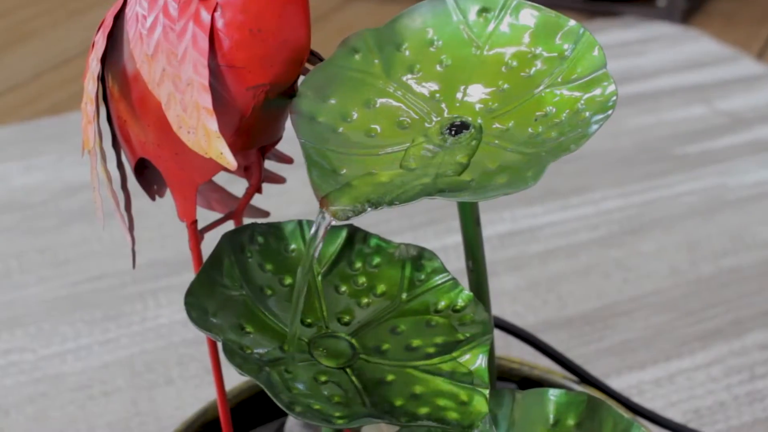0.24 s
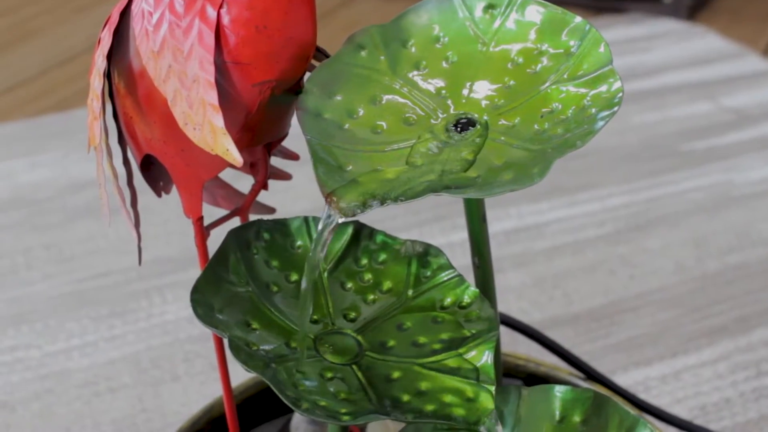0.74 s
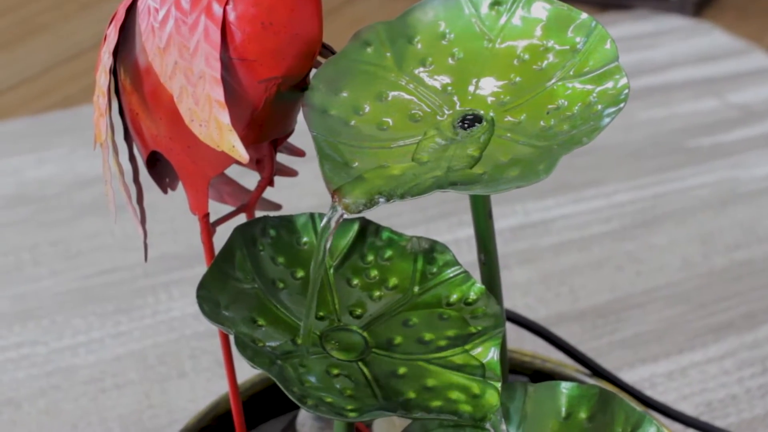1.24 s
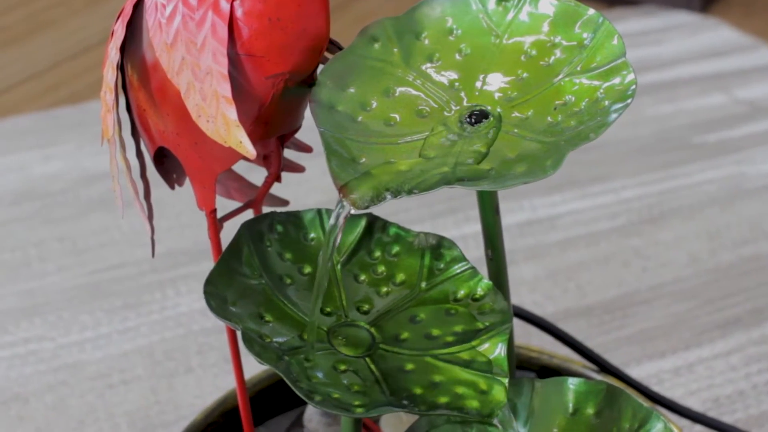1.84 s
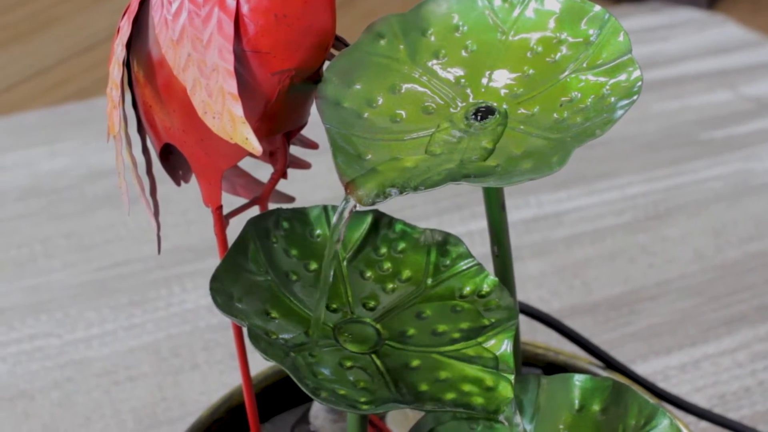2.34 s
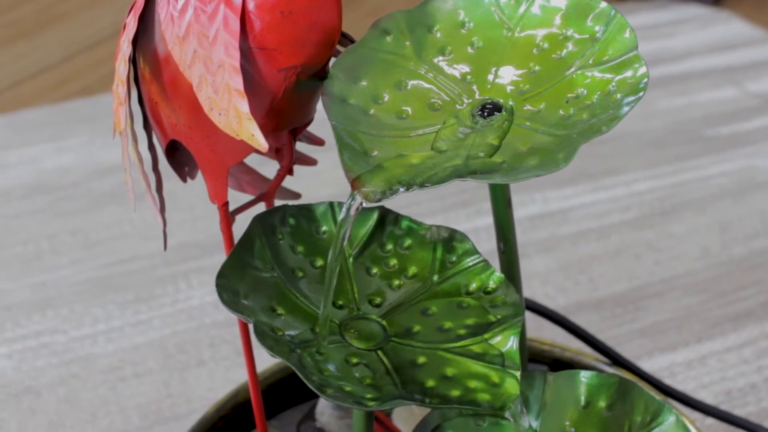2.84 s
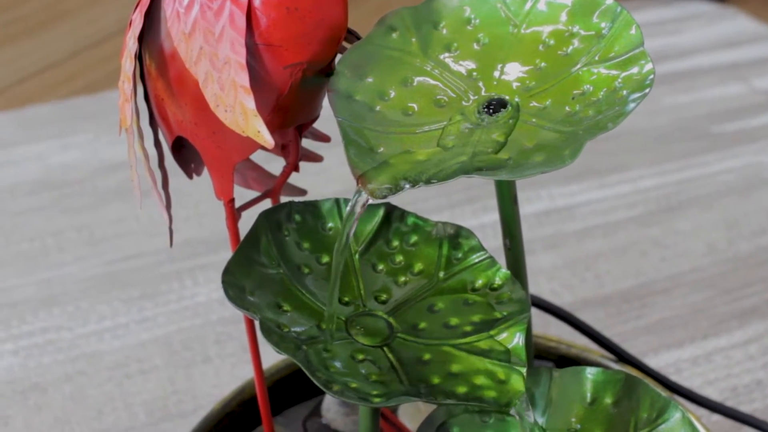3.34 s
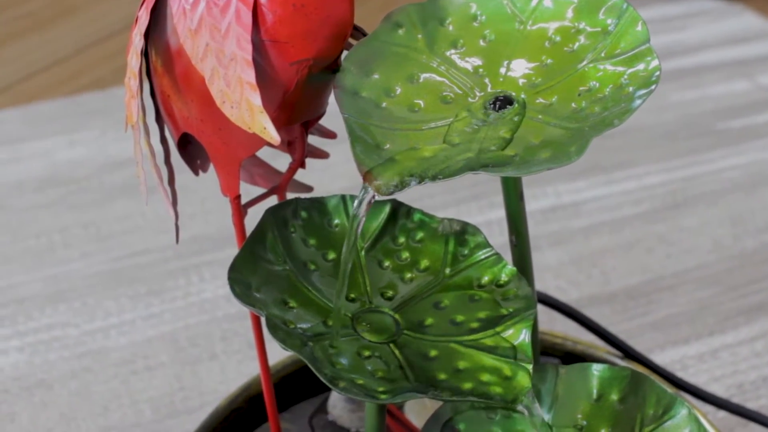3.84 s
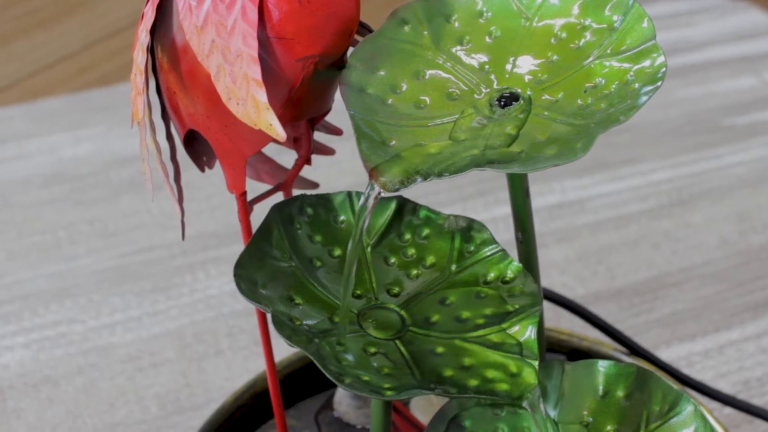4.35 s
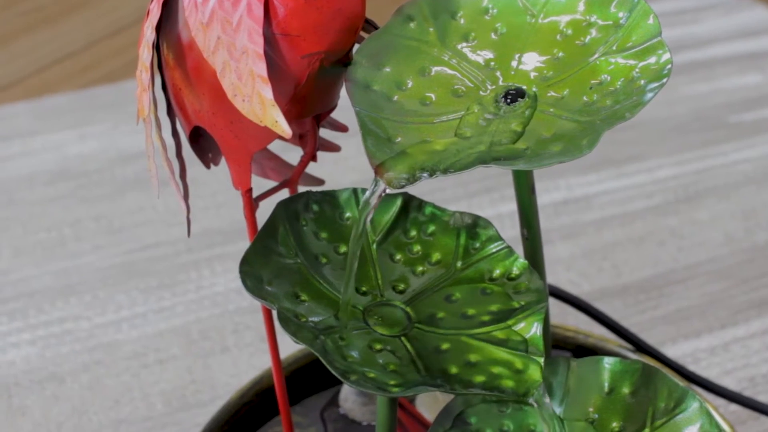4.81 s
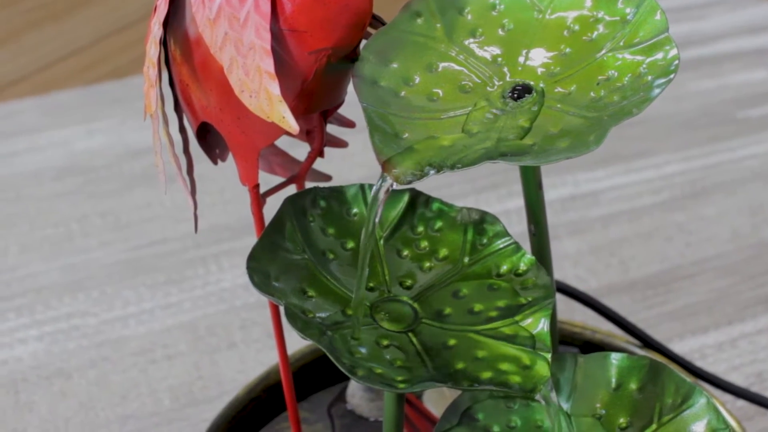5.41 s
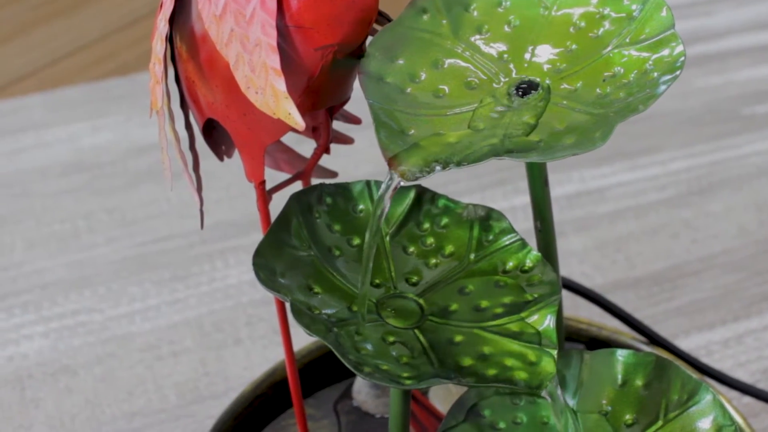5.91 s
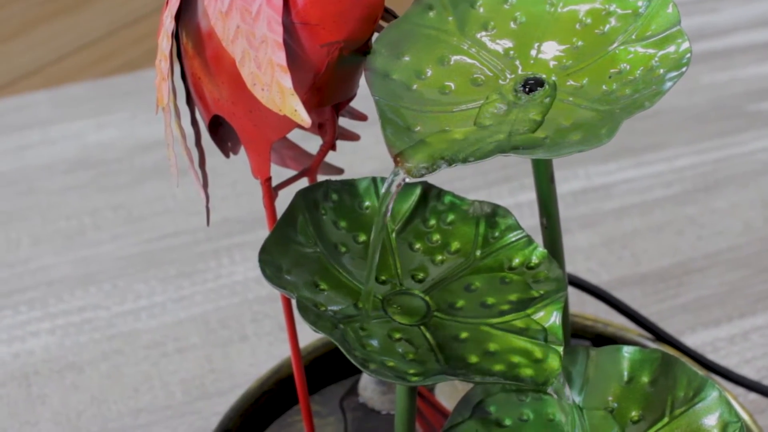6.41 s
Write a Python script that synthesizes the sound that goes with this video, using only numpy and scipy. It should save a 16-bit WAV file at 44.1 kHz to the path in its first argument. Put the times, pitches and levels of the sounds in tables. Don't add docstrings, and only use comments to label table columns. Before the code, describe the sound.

A small indoor fountain runs without pause for about 6.7 seconds, heard close in wide stereo. Water drips from metal leaves into a bowl of pebbles: each drop gives a sharp, very short crack and a tiny high bubble chirp, with fine spray between. Heavier drops add hollow, rounded plops on a medium-pitched bowl note, noticeable near 0.35, 2.0, 3.35 and 5.2 s. Bright splashes stand out around 0.23, 0.53, 2.0, 3.03, 5.0 and 5.74 s. Drips cluster densely around 2.3-2.6, 4.1-4.6 and 6.1-6.4 s, with slightly thinner moments near 0.7, 1.8 and 3.9 s. Beneath, the bowl murmurs with a dense patter, fine bubbles fizz, and soft room and pump hiss carries a faint uneven rumble. Echoes are quick and small, the room tail short. The trickle is still running at the end.

```python
import sys
import numpy as np
from scipy import signal
from scipy.io import wavfile

SR = 44100
rng = np.random.default_rng(int(sys.argv[2]) if len(sys.argv) > 2 else 0)


def boost(x):
    u = np.asarray(x, float) / 20
    return 10 ** u


def output_pcm(signal):
    pcm = np.clip(np.atleast_2d(signal).T, -1, 1) * 32767
    wavfile.write(sys.argv[1], SR, np.round(pcm).astype(np.int16))


N = 294147


def rms_one(x):
    return x / np.sqrt(np.mean(x ** 2) + 1e-20)


def at_hz(points, hz):
    table_hz, values = np.transpose(points)
    return np.interp(np.log(hz), np.log(table_hz), values)


def drift(rate_hz):
    r = np.exp(-80 * np.pi * rate_hz / SR)
    slow = signal.lfilter([1], [1, -2 * r, r * r], rng.standard_normal(N // 40 + 2002))[2000:]
    return np.interp(np.arange(N) / 40, np.arange(len(slow)), rms_one(slow))


def resonance(x, hz, width_hz):
    r = np.exp(-np.pi * width_hz / SR)
    feedback = [1, -2 * r * np.cos(2 * np.pi * hz / SR), r * r]
    return signal.lfilter([(1 - r * r) / 2, 0, (r * r - 1) / 2], feedback, x)


def band(x, low_hz, high_hz):
    return signal.sosfilt(signal.butter(2, [low_hz, min(high_hz, 20000)], "band", fs=SR, output="sos"), x)


def add(out, start_s, sound):
    at = int(start_s * SR)
    out[..., at:at + sound.shape[-1]] += sound[..., :N - at]


def bubble(hz, t60_s, rise, phase, swell_cycles):
    t = np.arange(2600) / SR
    shape = (1 - np.exp(-t * hz / swell_cycles)) * boost(-60 * t / t60_s)
    slide = 1 + rise * np.minimum(t, t60_s) / t60_s
    return shape / shape.max() * np.sin(2 * np.pi * hz * t * slide + phase)


def drops():
    # start_s, peak_db, bubble_hz, crack_over_peak_db
    specks = [(.2169, -23, 12500, -21), (.3012, -26, 9950, -11), (1.106, -17, 12500, -9),
              (1.1917, -15.5, 10250, -30), (1.5358, -13.5, 10070, -3.5), (1.6302, -16, 10560, -2),
              (1.861, -23.5, 13200, -11), (1.927, -23, 11870, -14), (2.134, -19.5, 11600, -10),
              (2.3942, -13.5, 10800, -8), (2.683, -25, 12900, -7), (2.931, -32, 10400, -7),
              (3.2046, -24, 13400, -15), (3.411, -22, 11800, 3), (3.525, -17.5, 10700, -8),
              (3.636, -23, 10900, -4), (3.646, -20, 10500, -6), (3.7627, -18.5, 10100, -18),
              (4.258, -15.5, 10500, -3), (4.416, -31, 13000, -1), (5.476, -32, 9700, -8),
              (5.036, -23, 9900, -6), (5.598, -11, 10500, -19), (5.533, -31, 12500, 2),
              (5.615, -23, 11100, -2), (6.123, -29, 12100, -5), (6.221, -22, 10000, -4),
              (6.657, -23, 12300, -6), (5.9908, -19, 9640, -6), (6.162, -18, 13100, -4)]
    small_drops = [(0.048, -19.5, 8660, -6), (0.5315, -8, 7500, -2.5), (.873, -24, 8050, -2.5),
                   (1.0294, -11, 8900, -6), (1.3397, -21, 9430, -16), (1.476, -10.5, 8860, -10),
                   (1.672, -17, 9150, -7), (2.0001, -6.5, 7100, -13), (2.5038, -9.5, 8730, -1.5),
                   (2.6277, -8.5, 7760, -6), (2.848, -25.5, 9300, -13), (2.9015, -16, 7100, -18),
                   (3.2226, -24, 9100, -3), (3.6037, -28, 8760, -2), (4.146, -16, 8850, 5),
                   (4.2472, -16, 8900, -8), (4.2912, -17.5, 8160, -3), (4.352, -14.5, 9750, -5),
                   (4.478, -8.5, 9200, -2), (4.502, -15, 7350, -14), (4.993, -5, 7680, -9),
                   (5.3622, -21, 9600, -17), (5.3764, -20.5, 9300, 3.5), (5.562, -10, 7080, -3),
                   (5.626, -17, 9300, -2), (6.2472, -16, 8720, -7), (6.2895, -8, 9500, -11),
                   (6.344, -17.5, 9500, -11), (6.506, -14, 9330, -6), (6.5849, -30, 7460, 3)]
    middle_drops = [(0.232, -4.5, 6980, -14), (0.559, -23, 6600, -6), (0.7074, -30, 6750, 6.5),
                    (.8096, -28, 6800, -3), (0.8268, -15.5, 6460, -2.5), (2.066, -11, 5660, -3),
                    (2.3149, -10.5, 6600, -4), (2.343, -9, 4940, -19), (2.436, -13.5, 6970, -2),
                    (2.471, -13.5, 5830, -1), (2.954, -26, 6350, 2), (3.0315, -6, 5000, -1),
                    (3.1703, -25.5, 4820, -9), (3.344, -31, 6040, 4), (3.361, -15, 6170, -11),
                    (3.616, -21.5, 5910, 1), (3.913, -30, 6070, 2), (4.1749, -17, 5540, 1),
                    (4.329, -18.5, 5870, -4), (4.559, -12, 6120, -5.5), (2.735, -39, 6000, 6),
                    (4.221, -34, 7200, -4), (4.583, -21, 5500, -9), (4.611, -11.5, 5870, -11),
                    (4.7327, -25.5, 4600, 1), (5.7422, -7, 6620, -7.5), (6.371, -25, 4770, -4)]
    large_drops = [(0.3526, -9, 4400, -1.5), (0.5118, -39, 1980, 15.5), (0.7705, -17, 4440, -5),
                   (0.9143, -26, 2690, 5), (1.3814, -16, 3140, -2.5), (2.2138, -18, 4530, 0.5),
                   (2.758, -37, 3100, 12), (2.8852, -29.5, 7550, 9), (3.271, -14.5, 3000, 0),
                   (3.49, -10, 3800, -2.5), (3.669, -14, 2360, 0), (3.8486, -22.5, 2820, -0.5),
                   (4.083, -36, 2400, 10), (4.112, -8, 4480, -2), (4.4148, -38, 2480, 11),
                   (4.863, -17, 4130, 1), (4.877, -20, 2770, -3), (5.2236, -11.5, 3910, 6.5),
                   (5.412, -24.5, 4300, -3), (5.6527, -44, 2360, 20), (5.777, -12.5, 4530, 5.5),
                   (5.896, -31.5, 2500, 9.5), (6.1083, -15, 3290, -3), (6.195, -17, 4650, 4),
                   (6.326, -22.5, 2760, -1), (6.401, -30, 1870, 2)]
    # start_s, peak_db, bubble_hz, crack_over_peak_db
    mixed_drops = [(0.72, -22.5, 7800, -6), (6.162, -29, 6500, 5), (1.2, -26, 7400, -5),
                   (2.8878, -11.5, 3240, -9), (3.499, -33, 3800, -20), (4.3, -34, 9000, 2),
                   (2.977, -30, 4700, 2), (2.8, -31, 13000, -8), (4.1, -23, 2460, -8), (4.5, -36, 2600, 0),
                   (5.5, -44, 2870, 3), (7.3, -22, 11000, 3), (6.2, -13, 2900, -10), (4.5, -22.5, 7500, -13),
                   (2, -23, 9500, 1), (4.9, -34, 1850, -1),
                   (.058, -26, 13500, -3), (.11, -25, 8800, -1), (.133, -30, 11000, -4), (.514, -28, 14000, -6),
             (1.475, -25, 13900, -3), (1.691, -31, 14000, -6), (2.89, -18, 7550, -10),
             (2.886, -32, 14000, -6), (3.225, -24, 14000, -8), (3.411, -24, 13800, -9),
             (3.526, -21, 7100, -10), (3.526, -16, 14000, -12), (3.633, -18, 13400, -8),
             (3.914, -25, 15400, -12), (4.1753, -15, 7500, -12), (4.33, -24, 12100, -6),
             (4.611, -24, 7800, -8), (4.862, -20.5, 10900, 1), (4.995, -31, 2400, 3),
             (5.373, -23, 10100, -8), (5.377, -32.5, 2580, 15), (5.412, -23.5, 2800, -4),
             (5.654, -20, 15400, -10), (2.315, -25.5, 11200, -9), (2.214, -22, 11000, -4),
             (3.668, -20, 11000, -4), (5.2236, -17, 3630, -20), (.3535, -18.5, 3800, -17),
             (6.327, -29, 11000, -6), (4.09, -29, 14000, -6)]
    # pitch_hz, width_hz, level_db
    leaves = [(3137, 70, -4), (3728, 60, -1), (4181, 60, -4), (4530, 70, -3), (4781, 70, -4),
              (6464, 90, -6)]
    middle_hz = 6000
    out = np.zeros((2, N))
    t = np.arange(2600) / SR
    for start_s, db, hz, crack_db in specks + small_drops + middle_drops + large_drops + mixed_drops:
        noise, chance = rng.standard_normal((4, len(t))), rng.random(3)
        octaves = np.log2(hz / middle_hz)
        pan_db = 3 * octaves + 2 * (2 * chance[2] - 1)

        touch = 2 * (t == 0)
        burst = noise[0] + 1.1 * np.sqrt(hz / middle_hz) * noise[2:] + touch
        lowest_hz = .62 * hz
        crack = band(burst * boost(-60 * t / .0065), lowest_hz, np.clip(2 * hz, 8500, 11500))
        crack = band(crack, lowest_hz, 15500)
        crack = boost(crack_db - 1.5) * crack / np.max(np.abs(crack))

        song_t60_s = .005 * np.sqrt(middle_hz / hz)
        song = boost(-7) * bubble(hz, song_t60_s, rise=0, phase=2 * np.pi * chance[0], swell_cycles=1.4)

        spatter_t60_s = 0.041 * (middle_hz / hz) ** 0.96
        spatter = resonance(resonance(noise[1] + .7 * noise[2:], hz, .17 * hz), hz, .6 * hz)
        spatter = boost(-18 + 2 * octaves) * rms_one(spatter)
        spatter = spatter * boost(-60 * t / spatter_t60_s) * np.minimum(t / 0.00016, 1)

        near = crack + song
        far = int(chance[0] > .5)
        near[far] = np.roll(near[far], int(7 * chance[1] * min(hz / middle_hz, 1) ** 2))
        makeup = np.max(np.abs(near)) ** .5 / np.max(np.abs(near.mean(axis=0))) ** .5
        both = near * makeup + spatter
        add(out, start_s + .0007, both * boost(db + np.array([[pan_db], [-pan_db]]) / 2))
    return out + sum(boost(db) * resonance(out, hz, width_hz) for hz, width_hz, db in leaves)


def plops():
    # start_s, peak_db, slap_db
    thumps = [(.16, -17, -8), (0.354, -11.5, -6.5), (0.393, -20, -7), (0.535, -25.5, -0.5), (.826, -18, -9),
              (.872, -19.5, -11), (1.381, -20, -5), (1.477, -17.5, -31), (1.629, -21, -3),
              (2.001, -11, -7.5), (2.065, -19, -9.5), (2.213, -20.5, -5.5), (2.301, -18, -15),
              (2.344, -18, -13), (2.505, -25, 2), (2.886, -23.5, 3), (3.03, -17, -5.5), (3.345, -13.5, -9),
              (3.49, -23.5, -0.5), (4.256, -27, 2), (4.415, -19, -5.5), (4.582, -26, -1.5),
              (5.224, -15, -0.5), (5.654, -17.5, -6.5), (5.894, -20, -2), (6.162, -19.5, -27),
              (6.195, -17.5, -5), (6.29, -20.5, -25), (6.352, -21.5, -9), (6.599, -16.5, -7)]
    # start_s, peak_db
    taps = [(0.461, -34), (.49, -26), (0.514, -22), (1.127, -26.5), (1.537, -23), (2.261, -27),
            (2.472, -27), (2.976, -30), (3.096, -28), (3.257, -35), (3.411, -23), (4.146, -25), (4.33, -27),
            (4.56, -24), (4.611, -27), (4.939, -24), (4.994, -29), (5.413, -26), (5.563, -24.5),
            (5.743, -22.5), (5.775, -22.5), (5.999, -28), (6.47, -24.5), (6.506, -31)]
    # start_s, peak_db, bubble_hz, slap_db
    pockets = [(0.911, -22.5, 1130, -3), (1.032, -24.5, 1307, -6), (1.61, -48, 1360, -9),
               (2.393, -27.5, 1466, 3.5), (2.563, -16.5, 1097, -8.5), (2.63, -31, 1510, 2),
               (2.734, -27, 1436, -1), (2.758, -21.5, 1060, 3.5), (2.952, -22, 1345, -15),
               (3.271, -25, 1390, 3), (3.668, -23, 1360, 7.5), (3.849, -24.5, 1510, -24),
               (4.084, -29, 1353, 5.5), (4.865, -34, 1440, 8.5), (5.38, -24.5, 1694, 6.5),
               (6.108, -35, 1330, 11.5), (6.402, -18, 1640, -3)]

    def main_note_hz():
        return 930 * (1 + 0.011 * rng.standard_normal())

    rows = [(s, db, main_note_hz(), slap_db, 0.04) for s, db, slap_db in thumps]
    rows += [(s, db, main_note_hz(), -8, 0.046) for s, db in taps]
    rows += [(*row, 0.042) for row in pockets]
    out = np.zeros(N)
    t = np.arange(2600) / SR
    for start_s, db, hz, slap_db, t60_s in rows:
        slap = rms_one(band(rng.standard_normal(len(t)), 1050, 1900)) * boost(-60 * t / .045)
        song = bubble(hz, t60_s, rise=0.017, phase=0, swell_cycles=1.2)
        add(out, start_s, boost(db - 9.5) * song + boost(db + slap_db - 10.0) * slap)
    out = band(out, 860, 6000)
    return out + boost(-1.0) * resonance(out, 908.3, 20.6)


def murmur():
    # pitch_hz, width_hz, level_db
    murmur_notes = [(488.3, 26.3, -8), (437.4, 5.5, -9.5), (609.5, 1.8, -8), (734.2, 11, -6),
                    (913.5, 22.5, -3), (953, 44.5, -3.5), (1188, 77, -9.5), (1360, 26.3, -3),
                    (1446, 27.5, -7.5), (1510, 21, -7.5), (1694, 34, -11), (1851, 33, -14), (2451, 46, -19.5),
                    (3126, 67, -17), (3290, 11, -16.5), (3746, 30, -18), (4530, 73, -27.5)]
    sizes = boost(4.54 * np.minimum(rng.exponential(1, N), 5)) * rng.choice([-1, 1], N)
    drops_per_s = 400 * boost(3.0 * drift(9))
    patter = rms_one(sizes * (rng.random(N) < drops_per_s / SR) + 1e-18)
    out = 0
    for (hz, width_hz, db), shift in zip(murmur_notes, rng.integers(0, N, len(murmur_notes))):
        trickle = boost(-3.5 + 2.5 * abs(np.log2(hz / 1e3))) * rng.standard_normal(N)
        ringing = resonance(np.roll(patter, shift) + trickle, hz, width_hz)
        out = out + boost(db) * np.sqrt(width_hz) * rms_one(ringing)
    return rms_one(out)


def fizz():
    sizes = boost(4.6 * np.minimum(rng.exponential(1, N), 3.5)) * rng.choice([-1, 1], N)
    born = rng.random(N) < 450 * boost(4.0 * drift(12)) / SR
    pitch_group = rng.integers(0, 12, N)
    out = 0
    for k, hz in enumerate(np.geomspace(2600, 13000, 12)):
        births = sizes * born * (pitch_group == k) + 1e-18
        rings = resonance(resonance(births, hz, 0.48 * hz), hz, 0.87 * hz)
        side_gain = boost(rng.normal(0, 6, (2, 1)))
        flip = [[1], [(-1) ** (k // 4)]]
        out = out + rings / np.sqrt(hz) * side_gain * flip
    return rms_one(out)


def hiss(patchy_db, rumble_db):
    # pitch_hz, level_db (per Hz)
    hiss_levels = [(18, -79), (30, -43.5), (118, -41.5), (359, -21), (480, -12.5), (792, -7), (928, -27.5),
                   (1090, -2), (1420, -8.5), (2220, -20), (3130, -17.5), (10300, -19), (15200, -25),
                   (16500, -51)]
    # pitch_hz, likeness (0 to 1)
    likeness = [(60, 0.35), (180, 1), (550, 0.85), (1650, 0.054), (4970, 0.018), (15000, 0.0082)]
    # pitch_hz, left_minus_right_db
    balance = [(60, 1), (180, 0.5), (550, 2.5), (1650, -3.5), (4970, -0.5), (15000, 1.5)]
    edges, lumps = 25 * 2 ** np.arange(0, 9.7, .4), drift(3)
    white = rng.standard_normal((2, 2, N))
    out = 0
    for k, (low, high) in enumerate(zip(edges, edges[1:])):
        mid, side = band(white[k % 2], low, high)
        hz = min(np.sqrt(low * high), 15200)
        alike = np.clip(0.72 * at_hz(likeness, hz) - .1, -1, 1)
        rumble = rumble_db * np.clip(lumps, -2, 1.2) * (hz < 110)
        gain = boost(at_hz(hiss_levels, hz) + patchy_db * drift(28.5) + rumble)
        tilt = boost(at_hz(balance, hz) * np.array([[.5], [-.5]]))
        stereo = np.sqrt(1 + alike) * mid + np.sqrt(1 - alike) * side * [[1], [-1]]
        out = out + gain * tilt * stereo
    return rms_one(signal.sosfilt(signal.ellip(10, .5, 50, 15950, fs=SR, output="sos"), out))


def space(x):
    t = np.arange(SR // 3) / SR
    hits = rng.standard_normal((2, len(t))) * (rng.random((2, len(t))) < 2500 / SR)
    echoes = hits * boost(-60 * t / .016)
    tail = rng.standard_normal((2, len(t))) * boost(-60 * t / 0.22) * (t > .004)

    def energy_one(h):
        return h / np.sqrt(np.sum(h ** 2, axis=1, keepdims=True))

    response = boost(-10) * energy_one(echoes) + boost(-12) * energy_one(tail)
    return x + signal.fftconvolve(x, response, axes=1)[:, :N]


def scene():
    # time_s, level_db
    stream = [(0, -0.5), (.3, 1), (.7, -3.5), (.95, 0), (1.86, -3), (2.6, -2), (3.6, -1), (3.9, -2),
              (4.7, -2), (5.22, -3.5), (5.74, -1), (5.92, -3), (6.3, 1), (6.43, -4), (6.67, 1.5)]
    flow_db = np.interp(np.arange(N) / SR, *np.transpose(stream))
    bowl = plops() + boost(-43.5 + 0.37 * flow_db) * murmur()
    water = drops() + boost(-55 + 0.99 * flow_db) * fizz() + boost(-3.0) * bowl
    water = boost(-1.0) * space(water) + boost(-2) * bowl
    water = signal.sosfilt(signal.butter(4, 420, "high", fs=SR, output="sos"), water)
    return water + boost(-42 + 0.52 * flow_db) * hiss(patchy_db=2.5, rumble_db=8)


def low_pass(x):
    return signal.sosfilt(signal.butter(12, 16650, fs=SR, output="sos"), x)


def record(dry):
    ceiling = .45
    rounding = ceiling * np.tanh(dry / ceiling) - dry
    mix = dry + band(rounding, 450, 17000)
    mix = signal.sosfilt(signal.butter(2, 25, "high", fs=SR, output="sos"), mix)
    mix = signal.sosfilt(signal.cheby2(10, 60, 17000, fs=SR, output="sos"), mix)
    return low_pass(mix)


dry = scene()
out = record(dry)
output_pcm(out)
```